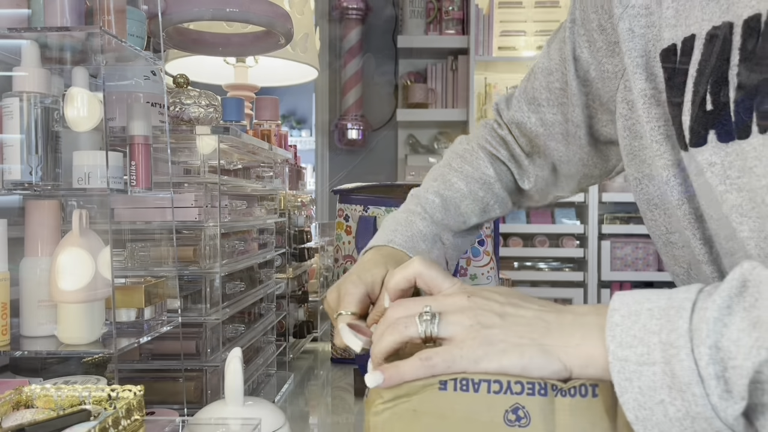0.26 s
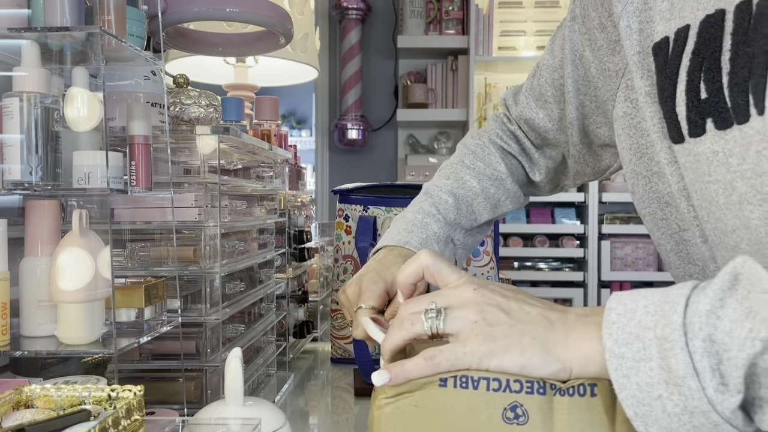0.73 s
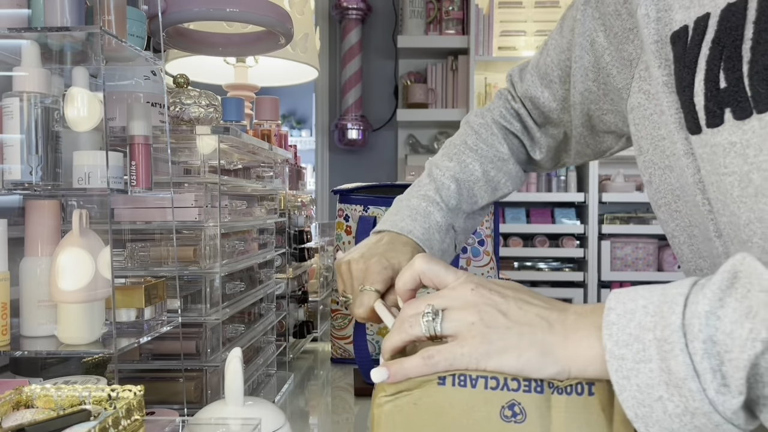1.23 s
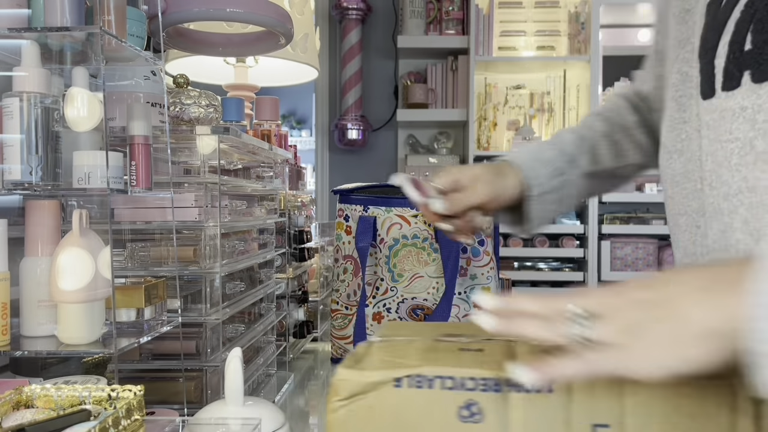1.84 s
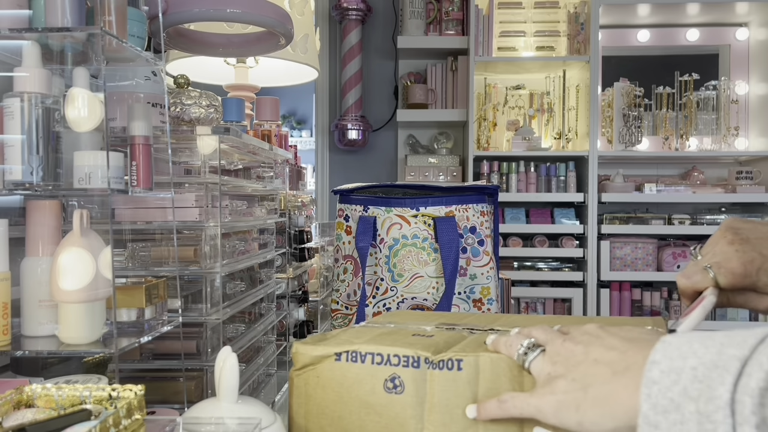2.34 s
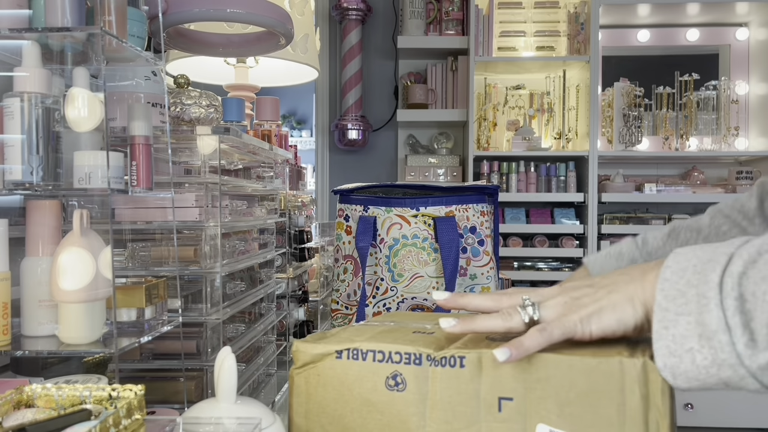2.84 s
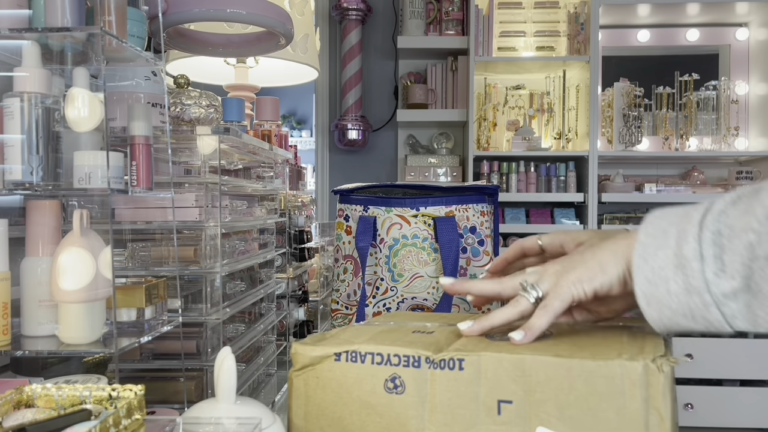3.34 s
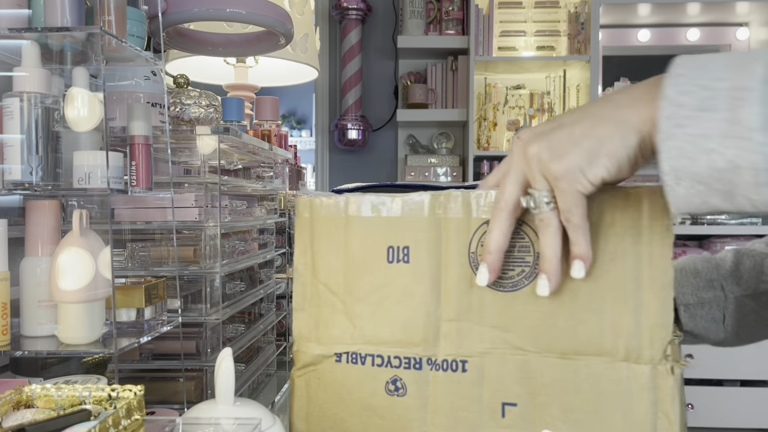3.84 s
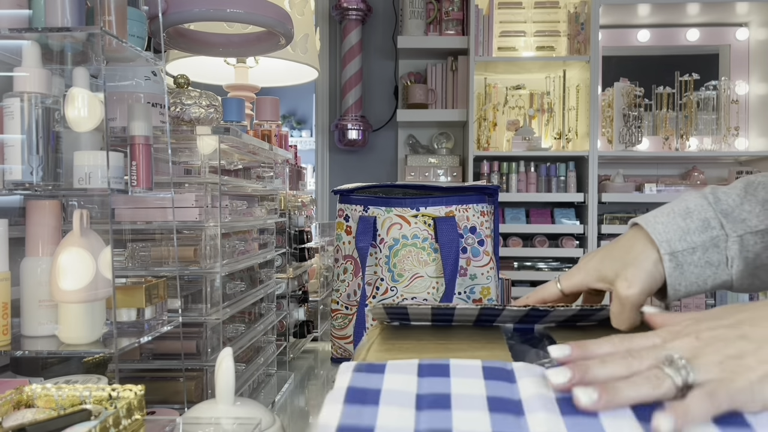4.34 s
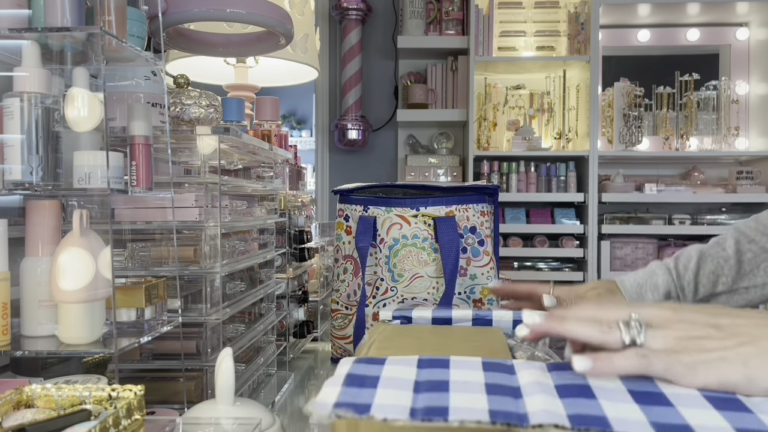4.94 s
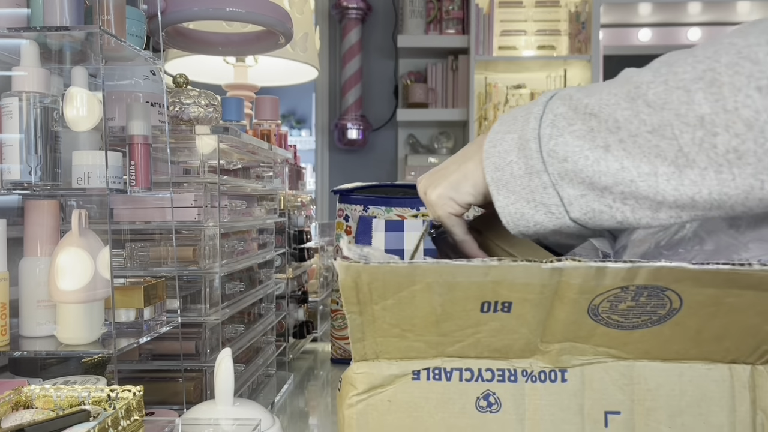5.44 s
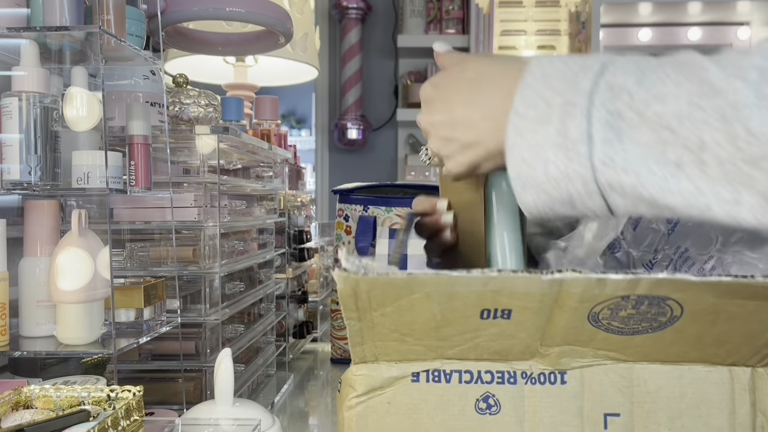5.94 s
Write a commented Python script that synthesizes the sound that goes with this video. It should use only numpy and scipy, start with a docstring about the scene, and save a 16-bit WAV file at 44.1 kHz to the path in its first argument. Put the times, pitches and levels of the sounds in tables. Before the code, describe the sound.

Tape on a cardboard box is slit with scrapes and ticks, a cutter clacks down, then flaps pop open and wrapping rustles.

```python
"""Faint ticks of tape and a scrape are heard first: a corrugated box is slit and opened by hand on a table.
Noise under uneven friction makes blade, hands, sleeves and wrapping drag and rustle; creases add random pops.
Bursts of tiny breaks part the tape; blows crunch fibres, send bending waves through the board and ring the box.
Decaying modes sound the cutter put down and the rocking box; a small, crowded room adds a diffuse echo.
A close pair of microphones listens, with resonant ports and rounded peaks."""
import sys
import numpy as np
from scipy import signal
from scipy.fft import rfft, irfft, next_fast_len
from scipy.io import wavfile

SR = 44100
rng = np.random.default_rng(int(sys.argv[2]) if len(sys.argv) > 2 else 0)


def wav_out(sig):
    """Save sig, one row per channel (or a flat mono array), as 16-bit PCM at SR to the path in sys.argv[1]."""
    wavfile.write(sys.argv[1], SR, np.round(np.clip(np.atleast_2d(sig).T, -1, 1) * 32767).astype(np.int16))


N = 272714
SHORT = 8192  # length of every short sound [samples]
AGE = np.arange(SHORT) / SR
TIME = np.arange(N) / SR
LEAD_S = .012  # place of the main break within a fracture [s]

# relative spectrum of breaking fibres: f/Hz, level/dB per Hz
CRUNCH_SPECTRUM = [(900, 4), (1700, 5), (3000, 1), (5000, -1.5), (8500, 4.5), (11500, 7), (16000, -3.5)]


def from_db(db):
    """Logarithmic level: 20 dB is a factor of ten in amplitude."""
    return 10 ** (np.asarray(db) / 20)


def rms_one(x):
    """Normalise the mean power: scale to rms 1."""
    return x / np.sqrt(np.mean(x ** 2) + 1e-20)


def burst_one(x):
    """Normalise the energy of a burst to that of 20 ms at rms 1."""
    return x / np.sqrt(np.sum(x ** 2) / (.02 * SR) + 1e-20)


def at_hz(points, hz):
    """Interpolate a table along a logarithmic frequency axis."""
    f, value = np.transpose(points)
    return np.interp(np.log(np.maximum(hz, 1)), np.log(f), value)


def colour(x, spectrum):
    """Minimum-phase filtering: a causal response follows a spectrum and falls away beyond its ends."""
    size = 2 * next_fast_len(x.shape[-1] // 2 + SHORT)
    closed = [(spectrum[0][0] / 2, -60), *spectrum, (spectrum[-1][0] * 2, -60)]
    gain = from_db(at_hz(closed, np.fft.rfftfreq(size, 1 / SR)))
    # folding the cepstrum onto positive times makes the response minimum-phase
    cepstrum = irfft(np.log(gain))
    cepstrum[1:size // 2] *= 2
    cepstrum[size // 2 + 1:] = 0
    response = np.exp(rfft(cepstrum))
    return irfft(rfft(x, size) * response)[..., :x.shape[-1]]


def band(x, low_hz, high_hz, order=2):
    """Band limitation by a Butterworth filter."""
    edges = [low_hz, min(high_hz, SR / 2 - 1000)]
    return signal.sosfilt(signal.butter(order, edges, "band", fs=SR, output="sos"), x)


def port(x, hz, width_hz):
    """Resonance: pass the band around one natural frequency."""
    return signal.lfilter(*signal.iirpeak(hz, hz / width_hz, fs=SR), x)


def drift(rate):
    """Random modulation of rms 1: straight lines join `rate` independent values per second."""
    knots = rng.standard_normal(N // 20)
    return rms_one(np.interp(TIME * rate, np.arange(len(knots)), knots))


def ring(modes, scatter_db=0, detune=0):
    """Modal superposition: decaying sines, weighted and tuned a little differently by each contact point."""
    hz, db, t60 = np.transpose(modes)[:, :, None]
    strength, shift = rng.standard_normal((2, len(modes), 1))
    sign = (-1) ** np.arange(len(modes))[:, None]
    decay = from_db(db + scatter_db * strength - 60 * AGE / t60)
    tones = np.sin(2 * np.pi * hz * (1 + detune * shift) * AGE)
    return np.sum(sign * decay * tones, axis=0)


def fracture(rise_s, decay_s, grain_db, before_db, before_s):
    """Avalanche fracture: tiny uneven breaks burst out at LEAD_S, and a few fibres give just before it."""
    breaks = rng.standard_normal(SHORT) * from_db(grain_db * rng.standard_normal(SHORT))
    after = np.maximum(AGE - LEAD_S, 0)
    avalanche = (1 - np.exp(-after / rise_s)) * np.exp(-after / max(decay_s, 1 / SR))
    warning = from_db(before_db) * np.exp(-np.abs(AGE - LEAD_S) / before_s)
    return breaks * (avalanche + warning)


def bend(x, lag_s):
    """Bending-wave dispersion: 100 Hz arrives lag_s late, higher notes sooner by the root of their frequency."""
    hz = np.fft.rfftfreq(2 * SHORT, 1 / SR)
    phase = np.exp(-4j * np.pi * lag_s * np.sqrt(100 * hz))
    return irfft(rfft(x, 2 * SHORT) * phase)[:SHORT]


def add(track, s, sound):
    """Superposition: mix a short sound in from time s."""
    start = max(round(s * SR), 0)
    track[..., start:start + SHORT] += sound[..., :N - start]


def widen(mid, side, width):
    """Mid-side stereo: left and right share the mid and take the side with opposite signs."""
    return mid + width * side * np.array([[1], [-1]])


def room(x, wet_db, first_s):
    """Diffuse reverberation: shelves scatter a short echo that is alike on both sides in the bass."""
    # reverberation time: f/Hz, t60/s
    room_t60 = [(60, 0.15), (250, 0.15), (1000, 0.091), (4000, 0.16), (12000, 0.073)]
    age = np.arange(SR // 2) / SR
    edges = np.geomspace(40, 16000, 10)
    echo = 0
    for low, high in zip(edges, edges[1:]):
        hz = np.sqrt(low * high)
        mid, side = band(rng.standard_normal((2, len(age))), low, high)
        spread = min(hz / 1500, 1)
        decay = from_db(-60 * age / at_hz(room_t60, hz))
        echo = echo + widen(mid, side, spread) / np.hypot(1, spread) * decay
    # silent until first_s, then a rise as long again
    echo = echo * np.clip(age / first_s - 1, 0, 1)
    echo = echo / np.sqrt(np.sum(echo ** 2) / 2)
    centre = x.mean(axis=0)[None]
    return x + from_db(wet_db) * signal.fftconvolve(centre, echo, axes=1)[:, :N]


def friction(spectrum, grain_db, slip_db, slips_per_s):
    """Stick-slip friction: dense tiny slips bunched by the uneven grip of the hand; stereo, rms 1."""
    # left-right correlation of the rubbing: f/Hz, correlation/1
    likeness = [(100, 1), (400, 0.79), (1200, 0.49), (4000, 0.57), (9000, 1), (14000, 1)]
    grip = from_db(slip_db * drift(slips_per_s) + grain_db * drift(1500))
    mid, side = rfft(rng.standard_normal((2, N)) * grip, next_fast_len(N, True))
    alike = np.clip(at_hz(likeness, np.linspace(0, SR / 2, len(mid))), 0, 1)
    both = irfft(widen(mid, side, np.sqrt((1 - alike) / (1 + alike))))[:, :N]
    return rms_one(colour(both, spectrum))


def crinkles(per_s, size_db):
    """Impulsive excitation: creases pop at random, each a dry tick of a few cycles at its pitch; rms 1."""
    pitches = np.geomspace(900, 9000, 14)
    happens = rng.random(N) < per_s / SR
    sizes = from_db(size_db * np.minimum(rng.exponential(1, N), 3))
    pops = happens * sizes * rng.choice([-1, 1], N)
    dealt = rng.integers(0, len(pitches), N)
    out = 0
    for k, hz in enumerate(pitches):
        out = out + port(pops * (dealt == k) + 1e-18, hz, hz / 3) / np.sqrt(hz)
    return rms_one(out)


def surface(rasp, hiss):
    """Roughness noise: surfaces rasp, crease and hiss; flaps, sleeve and wrapping add swells of the same."""
    # relative spectra of coarse and fine rubbing: f/Hz, level/dB per Hz
    rasp_spectrum = [(700, -19), (1200, 7.5), (2200, 6.5), (3300, 3), (6000, 2), (9000, -14)]
    hiss_spectrum = [(3500, -15), (6200, -11), (8500, -1.5), (11500, 0.5), (16000, -51)]
    # sliding swells: t/s of the peak, rise/s, fall/s, hiss level/dB, crinkling level/dB
    rustles = [(4.27, 0.11, 0.12, -39.5, -52.5), (4.8, 0.23, 0.13, -48, -78), (4.87, 0.2, 0.15, -42, -53.5),
               (5.33, 0.1, 0.12, -51.5, -51.5), (5.9, 0.14, 0.14, -52, -51)]
    for s, rise_s, fall_s, hiss_db, crinkle_db in rustles:
        swell = np.exp(-((TIME - s) / np.where(TIME < s, rise_s, fall_s)) ** 2)
        hiss = np.hypot(hiss, from_db(hiss_db) * swell)
        rasp = np.hypot(rasp, from_db(crinkle_db) * swell)
    rough = friction(rasp_spectrum, grain_db=0.5, slip_db=2.0, slips_per_s=91)
    rough = rough + from_db(-6) * crinkles(per_s=400, size_db=6.5)
    return rasp * rough + hiss * friction(hiss_spectrum, grain_db=2.0, slip_db=2.04, slips_per_s=52)


def stroke(start_s, end_s):
    """Drag envelope: a linear onset, a steady hold and an exponential release."""
    attack_s, release_s = 0.011, 0.014
    onset = np.clip((TIME - start_s) / attack_s, 0, 1)
    return onset * np.exp(-np.maximum(TIME - end_s, 0) / release_s)


def rubbing():
    """Pressure-dependent friction: as blade and hands press, the rumble grows faster than the rasp and hiss."""
    # relative spectra of the low and middle rubbing: f/Hz, level/dB per Hz
    rumble_spectrum = [(20, -15), (40, -25), (65, 5), (110, -7), (170, 3.5), (260, -13), (420, -26)]
    scrape_spectrum = [(170, -5.5), (290, 0), (480, -4.5), (750, -5), (1100, -13.5), (1800, -30.5)]
    # blade or hand on the board: start t/s, end t/s, level/dB, brightness/dB, weight on the box/dB
    drags = [(0.08, 0.179, -53, 5.5, -6), (0.288, 0.42, -50.5, -0.5, -3.5), (0.564, 1.015, -50, -2.5, -2.5),
             (1.002, 1.109, -39, 3.5, -4), (1.108, 1.258, -53, 1, 2.5), (1.353, 1.484, -49, 2, -2),
             (1.623, 1.894, -45.5, 4, -5), (1.483, 1.59, -35.5, 4, -2.5), (1.943, 2.459, -44.5, 1, -6),
             (2.024, 2.347, -42, 0, 1), (2.457, 2.57, -60, 1, 7.5), (2.76, 2.94, -63.5, -27, 7),
             (2.961, 3.2, -53.5, 2.5, 3), (3.19, 3.522, -44, 5, 1.5), (3.549, 3.657, -40, 8.5, -6),
             (3.65, 4.017, -56, 2.5, 5), (4.012, 4.38, -51, 4, 7), (4.384, 4.526, -45.5, 1, -2),
             (4.528, 5.22, -56.5, 3, 7), (5.24, 5.44, -46.5, -2, 0), (5.446, 5.58, -54, -1.5, 4.5),
             (5.586, 5.756, -47.5, 3.5, 3.5), (5.76, 6.186, -53, 2.5, 0.5)]
    # hands barely moving, before the constant envelope: level/dB, brightness/dB, weight/dB
    resting = (-59, -2, 0)
    steady_db = -48  # reference level of a steady drag
    # level in a steady drag [dB] and growth per dB of pressure
    rumble_db, rumble_per_db = -51.5, 1.22
    rasp_db, rasp_per_db = -60.5, 0.2
    hiss_db, hiss_per_db = -55.5, 0.47
    strokes = [(stroke(start_s, end_s), *rest) for start_s, end_s, *rest in drags]
    strokes.append((0.83, *resting))
    rumble = scrape = rasp = hiss = 0
    # powers of overlapping strokes add
    for shape, db, bright_db, weight_db in strokes:
        pressure_db = db - steady_db
        rumble = rumble + (shape * from_db(rumble_db + rumble_per_db * pressure_db + weight_db)) ** 2
        scrape = scrape + (shape * from_db(db)) ** 2
        rasp = rasp + (shape * from_db(rasp_db + rasp_per_db * pressure_db + 1.14 * bright_db)) ** 2
        hiss = hiss + (shape * from_db(hiss_db + hiss_per_db * pressure_db + bright_db)) ** 2
    low = np.sqrt(rumble) * friction(rumble_spectrum, grain_db=5.0, slip_db=0.5, slips_per_s=110)
    middle = np.sqrt(scrape) * friction(scrape_spectrum, grain_db=1.0, slip_db=3.5, slips_per_s=77)
    return low + middle + surface(np.sqrt(rasp), np.sqrt(hiss))


def rocking():
    """Rigid-body modes: after a shove the whole box wobbles on the table with a deep, faint throb."""
    # shoves: t/s, level/dB
    shoves = [(2.334, -43), (3.653, -35), (5.64, -40), (6.0, -43)]
    # slow modes of the box: f/Hz, level/dB, t60/s
    rocking_modes = [(42.7, 1, 0.32), (54.5, 3.5, 0.37), (70.4, -4.5, 0.41)]
    out = np.zeros((2, N))
    for s, db in shoves:
        throb = ring(rocking_modes, scatter_db=1.5, detune=.04)
        add(out, s, from_db(db) * throb * signal.windows.tukey(SHORT, .1))
    return out


def swipes():
    """Resonant friction: skin or an edge catches on the flutes and shakes one patch of board."""
    # short swipes of a hand or flap: t/s of the peak, half length/s, nominal centre f/Hz, level/dB
    swipe_table = [(0.379, 0.028, 650, -45.5), (0.996, 0.044, 1320, -49.5), (1.7, 0.18, 1470, -50.5),
                   (1.579, 0.014, 1080, -37.5), (2.127, 0.04, 1200, -50), (2.306, 0.067, 1350, -49),
                   (3.166, 0.012, 1000, -39), (4.304, 0.011, 1140, -36.5), (4.418, 0.03, 736, -41),
                   (4.889, 0.02, 1080, -46), (5.217, 0.0056, 1690, -48), (5.274, 0.046, 866, -48),
                   (5.476, 0.019, 980, -45.5), (5.606, 0.022, 1700, -42), (5.742, 0.011, 820, -44),
                   (5.922, 0.037, 1180, -46)]
    out = np.zeros((2, N))
    middle_s = AGE.mean()
    for s, half_s, hz, db in swipe_table:
        catches = rng.standard_normal((2, SHORT)) * from_db(2.8 * drift(297.7)[:SHORT])
        patch = rms_one(band(widen(*catches, width=0.49), hz / 3.0, hz * 1.54))
        swell = np.exp(-((AGE - middle_s) / half_s) ** 2)
        add(out, s - middle_s, from_db(db) * patch * swell)
    return out


def cutter():
    """Impact excitation of modes: the plastic cutter lands on the table and settles."""
    # contacts with the table: t/s, level/dB
    taps = [(2.4129, -30.5), (2.437, -60)]
    # modes of the cutter: f/Hz, level/dB, t60/s
    cutter_modes = [(420, -6, .03), (990, -2.5, 0.03), (2000, -25, 0.012), (2195, 6.5, 0.027),
                    (2450, -6, 0.012), (2580, -20, 0.013), (4300, -28, 0.04)]
    out = np.zeros((2, N))
    for s, db in taps:
        add(out, s, from_db(db) * ring(cutter_modes))
    return out


def tearing():
    """Progressive fracture: tape parts in coarse, bunched breaks that die down as the pull eases."""
    # blade through tape, or tape peeling off: t/s, decay length/s, level/dB
    tears = [(0.586, 0.073, -37), (1.02, 0.034, -49), (1.571, 0.04, -36), (1.652, 0.049, -44.5),
             (2.119, 0.044, -38), (3.598, 0.064, -30), (4.471, 0.06, -38.5)]
    out = np.zeros((2, N))
    for s, length_s, db in tears:
        bunches = from_db(0.8 * drift(540)[:SHORT])
        breaks = widen(*rng.standard_normal((2, SHORT)), width=0.12) * bunches
        crackle = rms_one(colour(breaks, CRUNCH_SPECTRUM))
        pull = (1 - np.exp(-AGE / 0.001)) * np.exp(-(AGE / length_s) ** 2)
        add(out, s, from_db(db) * crackle * pull)
    return out


def tape():
    """Sudden release of tension: threads of tape part with a sharp tick and shake the taut strip; the same
    sound also gives the blows at 0.56 s and 4.45 s a brighter crack."""
    # snaps, ticks and slaps, and the bright cracks of the blows at 0.56 s and 4.45 s: t/s, relative tick
    # level/dB, strip ring against the tick/dB
    snaps = [(0.0242, -45, -20), (0.119, -37.5, -8), (0.1482, -34, -7), (0.278, -39, -5), (0.307, -38, -12),
             (0.3506, -34, -7), (0.3732, -27.5, -14), (0.5642, -20, -14), (0.6772, -32, -22),
             (0.993, -41, -5), (1.0282, -35, -20), (1.0815, -25.5, -30), (1.2464, -38, -15),
             (1.738, -30, -20), (1.7519, -27, -22), (2.1247, -26, -30), (2.9307, -34.5, -4.5),
             (2.976, -31.5, 2.5), (3.034, -29.5, -4), (3.056, -21.5, -13.5), (3.1168, -15, -11.5),
             (3.194, -18, 1.5), (3.2029, -12, 3.5), (3.256, -18.5, 3.5), (3.3068, -37, 15),
             (4.4528, -31.5, 13.5)]
    # relative spectrum of a tick: f/Hz, level/dB per Hz
    tick_spectrum = [(2500, -11), (4600, -0.5), (6500, -0.5), (8500, 4.5), (11500, 3.5), (16000, -23)]
    # taut tape on the flap: f/Hz, relative level/dB, t60/s
    strip_modes = [(800, -15, .012), (1250, -12, .012), (1670, -8, .016), (2000, -5, .016),
                   (2300, -4, .012), (2570, 1, .017), (2800, -1, .013), (3180, 1, .017), (3430, -1, .014),
                   (3820, -5, .012)]
    out = np.zeros((2, N))
    for s, tick_db, ring_db in snaps:
        breaks = [fracture(rise_s=0.00038, decay_s=0.0023, grain_db=-2.5, before_db=-61, before_s=0.00094)
                  for _ in range(2)]
        strip = ring(strip_modes, scatter_db=-1.0, detune=0.0027)
        ticks = [burst_one(colour(b, tick_spectrum)) for b in breaks]
        rings = [burst_one(signal.fftconvolve(b, strip)[:SHORT]) for b in breaks]
        snap = from_db(-11.5) * widen(*ticks, width=0.14)
        snap = snap + from_db(ring_db - 13.0) * widen(*rings, width=0.41)
        left_of_centre = from_db([[.6], [-.6]])
        add(out, s - LEAD_S, from_db(tick_db) * snap * left_of_centre)
        # the released flap recoils with a faint, later thud
        recoil = burst_one(bend(band(signal.unit_impulse(SHORT), 88, 490, order=1), lag_s=0.033))
        add(out, s, from_db(tick_db - 27) * recoil)
    return out


def board():
    """Dispersive plate impact: a blow crunches fibres, spreads with its lows last and leaves the box ringing."""
    # jerks and blows: t/s, panel level/dB, air boom against the panel/dB, hardness of the contact/dB
    blows = [(0.267, -43, -11, 4), (0.566, -25.5, -9.5, 2), (0.627, -32, -5.5, -0.5),
             (0.76, -42.5, -4.5, -12), (0.839, -40.5, -8, -24), (1.042, -22, -6, -8.5),
             (1.051, -30.5, -10, 2.5), (1.09, -30, -9, 1.5), (1.112, -29.5, -9, -16), (1.363, -32, 1.5, 3),
             (1.483, -34.5, 1.5, -2.5), (1.504, -30.5, 1.5, -3.5), (1.527, -33, 1.5, 1),
             (1.568, -23, 3.5, -2.5), (1.636, -25, -14, 4.5), (1.868, -36, 4, -2),
             (2.049, -26.5, -7.5, -1.5), (2.096, -25.5, -7.5, -2.5), (2.144, -28.5, -7, -4.5),
             (2.197, -34.5, -6, -4), (2.256, -28.5, -8, -6.5), (2.327, -30.5, 2.5, 1.5),
             (2.751, -44, -9.5, -10.5), (3.205, -23.5, -9, 2.5), (3.351, -23, -10.5, -5.5),
             (3.42, -20, -16.5, -6), (3.436, -18.5, -8.5, -0.5), (3.57, -16.5, -23, -6),
             (3.607, -15, -14, -7), (3.634, -24, -14, 1), (3.643, -17, -4.5, -9), (3.7, -30.5, -8.5, 6),
             (4.025, -27, -3.5, -8.5), (4.152, -39, 6, 6.5), (4.305, -38, 1.5, 4), (4.453, -11, 0.5, -4),
             (4.745, -37, -2, -8), (4.772, -36.5, -3, 1.5), (4.9, -34.5, -7.5, 1), (5.242, -41, -9, -0.5),
             (5.524, -38.5, -6, -2.5), (5.636, -33, -4.5, -7), (5.663, -36, -2, -6.5),
             (5.85, -41, -5.5, 1.5), (5.977, -28, -1, -13)]
    # the box and its panels: f/Hz, relative level/dB, t60/s
    box_modes = [(67, -6, 0.069), (87, 9, 0.32), (136, 22, 0.012), (152, 6, 0.51), (202, -15, 0.51),
                 (229, 12, 0.056), (274, 15.5, 0.048), (366.5, -2, 0.62), (512, 23.5, 0.083),
                 (623, 37, 0.022), (697, 30.5, 0.082), (770, 24, 0.06), (920, -6, 0.012),
                 (1154, 22.5, 0.21)]
    firm_db = -30  # a firm blow: reference for the force
    # harder blows knock more, crunch for less time and creak less before they break
    base_knock_db, knock_per_db = -9, 0.29
    firm_crunch_s, crunch_halves_db = 0.0038, 38
    base_creak_db, creak_per_db = -25.5, 0.1
    # the struck patch rings an octave higher for every patch_octave_db of hardness
    base_patch_hz, patch_octave_db, patch_t60_s, patch_db = 765, 15, 0.066, -6.5
    out = np.zeros((2, N))
    for s, panel_db, boom_db, hardness_db in blows:
        force_db = panel_db + hardness_db - firm_db
        knock_db = hardness_db + base_knock_db + knock_per_db * force_db
        crunch_s = firm_crunch_s * .5 ** (force_db / crunch_halves_db)
        creak_db = base_creak_db - creak_per_db * hardness_db
        # the board gives way in one push with a short, uneven crumple
        crumple = from_db(-25) * rng.standard_normal(SHORT) * np.exp(-AGE / .004)
        push = signal.unit_impulse(SHORT) + crumple
        ringing = from_db(-49) * burst_one(ring(box_modes, scatter_db=2.5, detune=.06))
        # where the blow lands sets the shares of air boom, panel and knock: f/Hz, level/dB per Hz
        shares = [(30, boom_db + 27), (75, boom_db + 50.5), (150, boom_db + 51.0), (270, 44.8),
                  (560, 38.1), (900, knock_db + 37), (1600, knock_db + 26.5)]
        add(out, s, from_db(panel_db) * colour(bend(push + ringing, lag_s=0.00612), shares))
        patch_hz = min(base_patch_hz * 2 ** (hardness_db / patch_octave_db), SR / 4)
        patch = ring([(patch_hz, 0, patch_t60_s)])
        add(out, s, from_db(panel_db + knock_db + patch_db) * burst_one(patch))
        fibres = []
        for _ in range(2):
            breaks = fracture(rise_s=0.001, decay_s=crunch_s, grain_db=10.5, before_db=creak_db, before_s=0.013)
            fibres.append(burst_one(colour(breaks, CRUNCH_SPECTRUM)))
        add(out, s - LEAD_S, from_db(panel_db + hardness_db - 8.5) * widen(*fibres, width=0.36))
    return out


def scene():
    """Superposition of all sources, a little left of centre; the level dips briefly at times."""
    # brief dips of the level: t/s, half width/s
    dips = [(1.333, 0.03), (1.924, 0.0063), (2.723, 0.016), (4.124, 0.012), (5.228, 0.0073)]
    events = board() + tape() + tearing() + cutter() + swipes()
    mix = room(events, wet_db=-10.0, first_s=0.0028) + rocking() + rubbing()
    dips_db = -15.5 * sum(np.exp(-((TIME - s) / width) ** 2) for s, width in dips)
    return mix * from_db(dips_db) * from_db([[1.3], [-1.3]])


def record(dry):
    """Port resonance and saturation: the left port turns in phase, the top falls away, peaks are rounded."""
    top_leak, cutoff_hz = from_db(-25), 16300
    # taking away twice a resonance turns the phase and keeps the level
    left = dry[0] - 2 * port(dry[0], hz=9970, width_hz=1760)
    left = left - 2 * port(left, hz=12370, width_hz=2120)
    right = dry[1] + from_db(-4.5) * port(dry[1], hz=10280, width_hz=2400)
    right = right - from_db(-9) * port(dry[1], hz=5500, width_hz=2400)
    right = np.pad(right, (1, 0))[:N]  # the sound reaches the right port a sample later
    both = np.array([left, right])
    below = signal.sosfilt(signal.butter(12, 12100, fs=SR, output="sos"), both)
    rounded = 1.1 * np.tanh((below + top_leak * both) / 1.1)
    return signal.sosfilt(signal.ellip(10, .1, 80, cutoff_hz, fs=SR, output="sos"), rounded)


dry = scene()
out = record(dry)
wav_out(out)
```